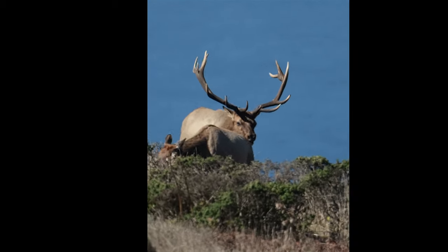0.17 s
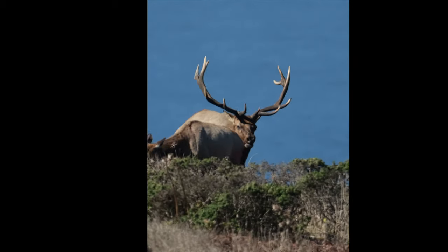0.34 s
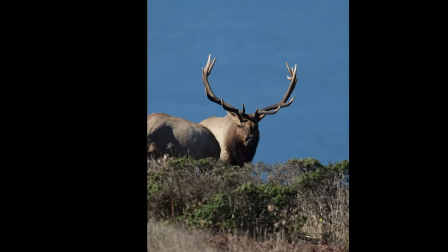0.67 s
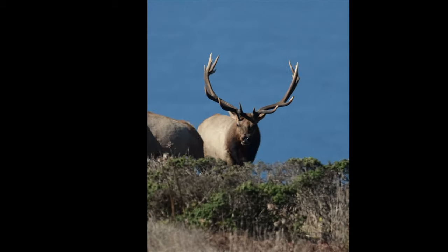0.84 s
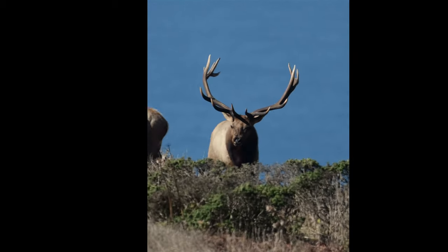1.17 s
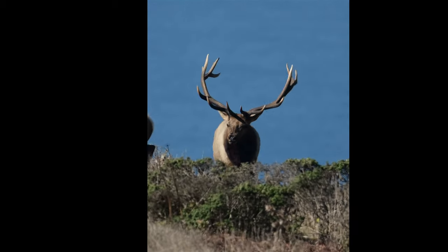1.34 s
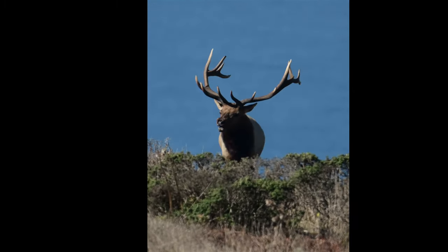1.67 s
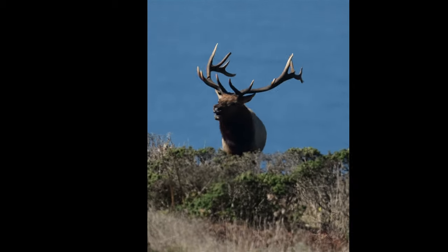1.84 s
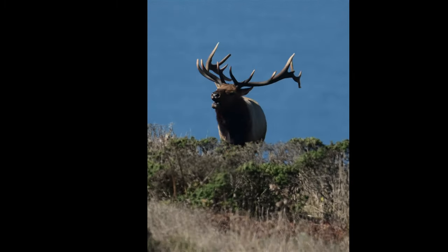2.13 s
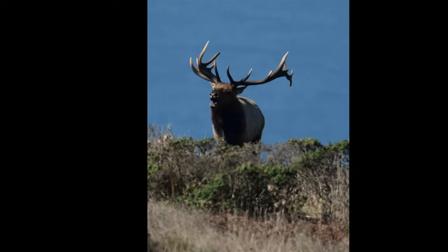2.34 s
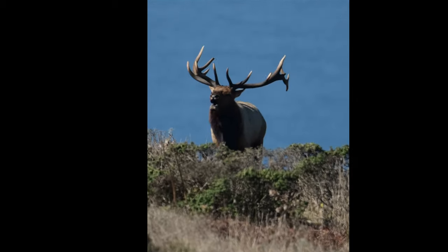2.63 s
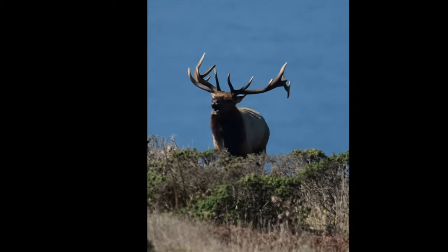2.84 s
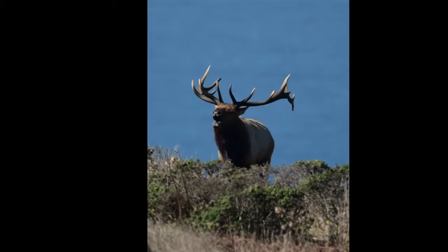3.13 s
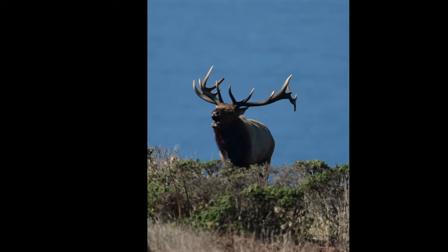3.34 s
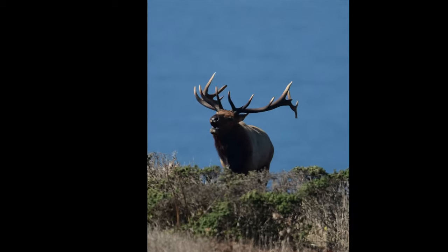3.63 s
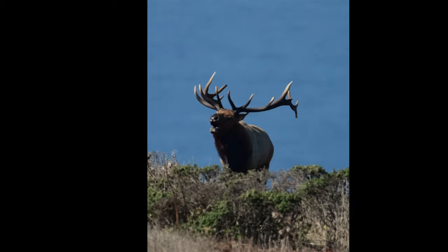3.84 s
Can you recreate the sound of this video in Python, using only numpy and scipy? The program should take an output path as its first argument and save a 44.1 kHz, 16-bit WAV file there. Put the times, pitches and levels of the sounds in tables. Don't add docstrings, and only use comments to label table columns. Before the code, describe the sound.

A bull elk bugles, its whistle leaping up into a held, buzzing high note over wind.

```python
import sys
import numpy as np
from scipy import signal
from scipy.fft import rfft, irfft, next_fast_len
from scipy.io import wavfile
from scipy.ndimage import uniform_filter1d, map_coordinates

SR = 44100
rng = np.random.default_rng(int(sys.argv[2]) if len(sys.argv) > 2 else 0)


def voltage_ratio(decibels):
    exponent = np.asarray(decibels, float) / 20
    return 10 ** exponent


def wav_record(signal):
    frames = np.transpose(np.atleast_2d(signal))
    bounded = np.clip(frames, -1, 1)
    quanta = np.round(bounded * 32767).astype(np.int16)
    wavfile.write(sys.argv[1], SR, quanta)


N = 176400
TIME = np.arange(N) / SR

# pitch_hz, level_db (per Hz)
ROAR_COLOUR = [(15, -55), (25, -13), (48, -1.5), (168, -5), (306, -8), (546, -8.5), (787, -12), (1950, -25),
               (2500, -18.5), (3250, -62), (5500, -120)]
# pitch_hz, side_over_mid_db
ROAR_WIDTH = [(60, -42), (160, -52), (270, -34), (450, -16.5), (740, -12), (1220, 4), (2010, 4.5)]
# pitch_hz, width_hz, level_db, side_over_mid_db
HUMS = [
    (181.8, 17, -68, -45),
    (268.6, 7.5, -68, -37),
    (491.8, 18.5, -70.5, -19),
    (555.5, 46, -67.5, -29),
    (628.5, 12, -75, -1),
    (1008, 334, -66, -12.5),
    (1899, 93, -69, 3),
]
# time_s, level_db
GUSTS = [
    (0, -57),
    (.25, -52.5),
    (.85, -58.5),
    (1.5, -60.5),
    (2.15, -56),
    (2.5, -52.5),
    (3.1, -58),
    (3.45, -50.5),
    (3.6, -62),
    (4, -82),
]
# pitch_hz, level_db
RUMBLE_COLOUR = [(30, -24), (60, 3), (110, -3.5), (190, -4.5), (300, -8.5), (500, -47)]
# peak_s, level_db, pitch_hz
THUMPS = [(0.057, -43.5, 126), (0.097, -51, 174), (0.14, -49, 84), (0.158, -39, 125), (0.195, -41.5, 108),
          (0.219, -41, 137), (0.252, -38.2, 132), (0.269, -46, 165), (0.358, -39.5, 189),
          (0.384, -48.5, 152), (0.411, -50, 100), (0.441, -31, 174), (0.608, -44, 154), (0.64, -40.5, 130),
          (0.826, -37, 164), (0.856, -41, 97), (0.912, -46, 136), (0.944, -43.5, 150), (1.008, -42.5, 143),
          (1.671, -44, 100), (1.831, -46, 101), (1.88, -45, 141), (2.222, -51, 154), (2.315, -38.5, 103),
          (2.331, -35.5, 167), (2.359, -50, 148), (2.402, -37.5, 111), (2.445, -44, 116),
          (2.47, -44.3, 94.5), (2.601, -37, 186), (2.64, -39, 123), (2.685, -37.5, 129),
          (2.716, -40.5, 160), (2.821, -38.5, 149), (3.017, -46, 124), (3.049, -42.2, 143),
          (3.13, -44, 170), (3.193, -43, 93), (3.211, -43.1, 109), (3.347, -44, 159), (3.428, -46.5, 170),
          (.816, -34, 100), (3.003, -40.5, 109), (3.11, -42, 89)]
# start_s, length_s, from_hz, to_hz, level_db
CHIRPS = [
    (.47, 0.056, 6170, 6370, -64),
    (2.245, 0.041, 8730, 7340, -52),
    (2.269, 0.024, 7800, 7540, -52),
    (2.42, 0.043, 8700, 7700, -65),
    (2.506, 0.046, 8350, 7900, -65),
]
# start_s, level_db, fade_60db_s, lowest_hz, highest_hz, ring_hz
TICKS = [
    (1.2575, -39, .005, 500, 5000, 6000),
    (1.7908, -36.5, .012, 3000, 3500, 4000),
]
# time_s, level_db
HUFF = [
    (2.68, -110),
    (2.74, -70),
    (2.9, -66),
    (2.98, -61),
    (3.03, -72),
    (3.08, -110),
]
# start_s, end_s, from_hz, to_hz
STEPS = [
    (2.728, 2.772, 755, 790),
    (2.808, 2.878, 1015, 1090),
    (2.878, 2.918, 1080, 1172),
    (2.918, 2.972, 1440, 1472),
    (2.974, 2.994, 1520, 1685),
    (2.994, 3.013, 1695, 1722),
    (3.013, 3.048, 1790, 1955),
    (3.048, 3.094, 1965, 2060),
    (3.094, 3.11, 2060, 2090),
]
# level_db, overtones_db, half_order_lines_db, grain_0_to_1
STEP_STRENGTH = [
    (-51, -16, -20, 0.8),
    (-43, -14, -17, 0.77),
    (-46.5, -12, -7, 0.9),
    (-35, -13, -6.5, 0.2),
    (-53, 12, -14, 1),
    (-42, 4, -18, .6),
    (-50, 9.5, -28, 0.18),
    (-46, 9, -28, 0.06),
    (-41, 2.5, -26, 0.1),
]
# pitch_hz, level_db
THROAT = [(2100, 0.5), (2900, -10.5), (3400, -21), (3750, 6.5), (4300, 2), (5200, -11), (6200, 0),
          (8300, -13.5), (9500, -45)]
# time_s, whistle_hz, folds_hz
HOLD = [(3.1, 2165, 275), (3.12, 2235, 265), (3.14, 2262, 254), (3.2, 2286, 243), (3.3, 2285, 226),
        (3.36, 2290, 218), (3.43, 2297, 209), (3.5, 2310, 206), (3.62, 2311, 205), (3.83, 2300, 204),
        (4, 2294, 203)]
# time_s, level_db, lean_db and buzz_db (per sideband)
MOUTH = [
    [(3.11, -67, 5, -4), (3.15, -69.5, 10.5, -3.5), (3.2, -60.5, 1.1, -4.5), (3.26, -55.5, 1.5, -5),
     (3.31, -54.5, 1.5, -3), (3.36, -56, 0.5, 1), (3.42, -55, 1.3, 1), (3.5, -57, 0, 4.1),
     (3.56, -58.5, 1.5, 3), (3.62, -56, -1.5, 2.5), (3.64, -57.7, 3.5, -1), (3.73, -52.5, 3.5, -5.3),
     (3.75, -53, -1, 0.5), (3.83, -50.5, -0.5, -1), (3.91, -54.5, 1, 2), (4.0, -56, -2.7, -2)],
    [(3.11, -45, -6, -15), (3.15, -52, -8, -11.5), (3.2, -59, -2, -6.5), (3.26, -62, 1, 1),
     (3.31, -53.5, 0.3, -3.5), (3.36, -60.5, 1.4, 3.0), (3.42, -63.5, 1.7, 0.6), (3.5, -64.5, 0.5, -0.5),
     (3.56, -64.5, 2.4, 2.5), (3.62, -60.5, 0.7, 0.8), (3.64, -66, 3, 1), (3.73, -72, 3.8, 2),
     (3.75, -69.5, 1.5, 2.5), (3.83, -56, 0.5, -0.8), (3.91, -54, 1, -1.2), (4.0, -55.3, 0.3, -1.3)],
    [(3.11, -54.5, 7, -6), (3.15, -43, 6, -14), (3.2, -39, -5, -15), (3.26, -43.5, -4.5, -8.5),
     (3.31, -53.5, -8, -4.5), (3.36, -66, 2, 4), (3.42, -53.5, 0, -1.7), (3.5, -58.5, -1, 2),
     (3.56, -68.5, -1.7, 6), (3.62, -55.5, -2, 2), (3.64, -60, -5, -2), (3.73, -54.5, 0.4, -2.5),
     (3.75, -54.5, 2, 2.5), (3.83, -48, 1.2, -2), (3.91, -50, -3, -4.5), (4.0, -53.5, 0.5, -2.5)],
]
SIDEBANDS = [
    (-25, -7.5, -13, 18.8, 20.8, 21.1, -4.5, -35, -43),
    (-8.5, -6.5, 3.5, 7.2, 3.9, 10.5, 2, -2.5, -7),
    (-13, -10, 2.5, 8.3, 10, 2.5, -4.3, -21, -33),
]
# time_s, level_db
FOURTH = [
    (3.12, -60),
    (3.15, -27),
    (3.25, -26.5),
    (3.32, -33),
]
# start_s, end_s
BREAK_S = (3.63, 3.739)
FRAY_S = (3.32, 3.5, 3.74, 3.8)
# pitch_hz, lead_radians
LEFT_LEAD = [(2200, 0.56), (4500, -.1), (6700, 0.87)]
# pitch_hz, level_db
HISS_COLOUR = [(1500, -9.5), (3000, 0.5), (5000, -0.5), (9000, -4.5), (13000, -8.5), (15700, -15)]
# pitch_hz, width_hz, gain_left_at_centre
NOTCHES = [(2591, 850, 0.09), (7770, 1530, 0.036)]
# multiple_of_base_pitch, level_db
WHINE = [(4, -88), (5, -85)]


def unit(x):
    return x / np.sqrt(np.mean(x ** 2) + 1e-20)


def along(points, hz):
    f, v = np.transpose(points)
    return np.interp(np.log(hz + 1), np.log(f + 1), v)


def curves(rows):
    s, *cols = np.transpose(rows)
    return [np.interp(TIME, s, c) for c in cols]


def wobble(rate, size=N):
    knots = rng.standard_normal(int(size * rate / SR) + 4)
    return map_coordinates(knots, [np.arange(size) * rate / SR])


def filtered(x, response):
    m = next_fast_len(N + SR // 2)
    return irfft(rfft(x, m) * response(np.fft.rfftfreq(m, 1 / SR)), m)[..., :N]


def band(f, hz, width_hz):
    return 1j * f * width_hz / (hz * hz - f * f + 1j * f * width_hz)


def spread(response, wide_db):
    noise = rng.standard_normal((2, N))
    mid, side = filtered(noise, lambda f: response(f) * [np.ones_like(f), voltage_ratio(wide_db(f))])
    return np.array([mid + side, mid - side]) / np.std(mid)


def turns(hz):
    return 2 * np.pi * np.cumsum(hz) / SR


def roar():
    level_db = -56 + 1.23 * wobble(2.88)
    out = voltage_ratio(level_db) * spread(lambda f: voltage_ratio(along(ROAR_COLOUR, f)), lambda f: along(ROAR_WIDTH, f))
    for hz, width_hz, db, wide_db in HUMS:
        out = out + voltage_ratio(db) * spread(lambda f: band(f, hz, width_hz) ** 2, lambda f: wide_db + 0 * f)
    deep_hz = 62 + 1.93 * wobble(5.49)
    return out + voltage_ratio(-59.5 + 1.6 * wobble(4.5)) * np.sin(turns(deep_hz))


def buffets():
    thump_cycles, lumps_db = 0.62, -0.5
    gust_db, = curves(GUSTS)
    rumble = unit(filtered(rng.standard_normal(N), lambda f: voltage_ratio(along(RUMBLE_COLOUR, f))))
    out = voltage_ratio(gust_db - 2) * unit(rumble * voltage_ratio(lumps_db * wobble(24.3)))
    for s, db, hz in THUMPS:
        cycles = (TIME - s) * hz
        swell = np.exp(-(cycles / thump_cycles) ** 2)
        out = out + voltage_ratio(db - 1.0) * swell * np.cos(2 * np.pi * cycles + rng.uniform(0, 2 * np.pi))
    return out


def birds():
    out = np.zeros(N)
    for s, length_s, from_hz, to_hz, db in CHIRPS:
        u = np.arange(round(length_s * SR)) / SR / length_s
        hz = from_hz + (to_hz - from_hz) * u ** 0.89 + 90 * wobble(230, size=len(u))
        out[round(s * SR):][:len(u)] += voltage_ratio(db) * np.sin(np.pi * u) * np.sin(turns(hz))
    return out * voltage_ratio([[-2.5], [1.5]])


def ticks():
    out = np.zeros((2, N))
    for s, db, fade_s, low_hz, high_hz, ring_hz in TICKS:
        u = TIME - s
        fade_db = -60 * np.maximum(u - fade_s / 2, 0) / fade_s
        burst = rng.standard_normal((2, N)) * (u > 0) * voltage_ratio(db + fade_db)

        def body(f):
            low_cut = (1j * f / (low_hz + 1j * f)) ** 2
            return (1 + band(f, ring_hz, 600)) * low_cut / (1 + 1j * f / high_hz) ** 2 / (1 + (f / 13000) ** 8)
        out += filtered(burst, body)
    return out


def climb():
    swell_share, ring_s, overtone_ring_s = 0.7, 0.13, 0.012
    out = np.zeros(N)
    t = np.arange(SR // 4) / SR
    for (s, end, from_hz, to_hz), (db, over_db, half_db, grain) in zip(STEPS, STEP_STRENGTH):
        part = t / (end - s)
        glide = np.maximum(1 - part, 0) ** 2
        hz = to_hz - (to_hz - from_hz) * glide + 6 * wobble(70, size=len(t))
        phase = turns(hz)
        after = np.maximum(t - (end - s), 0)
        rise = np.sin(np.pi / 2 * np.minimum(part / swell_share, 1))
        tone = rise * voltage_ratio(2 * grain * wobble(50, size=len(t)) - 60 * after / ring_s) * np.sin(phase)
        for k in np.arange(4, 11) / 2:
            level_db = over_db + half_db * 2 * (k % 1) + along(THROAT, k * hz) - 4 * (k - 2)
            level_db = level_db + 3.1 * wobble(56, size=len(t)) - 60 * after / overtone_ring_s
            rasp = (1 + grain * wobble(510, size=len(t))) / np.hypot(1, grain)
            tone = tone + rasp * rise ** 0.32 * voltage_ratio(level_db) * np.sin(k * phase)
        out[round(s * SR):][:len(t)] += voltage_ratio(db) * tone
    huff_db, = curves(HUFF)
    air = unit(filtered(rng.standard_normal(N),
                        lambda f: band(f, 3700, 460) ** 2 + 0.13 * band(f, 4200, 2500) ** 2))
    return out + voltage_ratio(huff_db) * air


def slope(x):
    fade_60db_s = 0.11
    t = TIME[:SR // 3]
    tail = rng.standard_normal((2, len(t))) * voltage_ratio(-60 * t / fade_60db_s)
    delayed = np.pad(x, (200, 0))[None]
    return signal.fftconvolve(delayed, tail / np.linalg.norm(tail[0]), axes=1)[:, :N]


def hold():
    attack_s, break_edge_s = 0.014, 0.004
    calm, break_rough, jitter_hz = 0.14, 0.28, 18
    flutter_db, flicker, breath_db = 1.2, 4.5, -9
    a = round(HOLD[0][0] * SR)
    whistle_hz, folds_hz = [c[a:] for c in curves(HOLD)]
    n, t = N - a, TIME[a:]
    fourth_db = curves(FOURTH)[0][a:]
    inside_s = np.minimum(t - BREAK_S[0], BREAK_S[1] - t)
    broken = np.clip(inside_s / break_edge_s + 0.5, 0, 1)
    rough = calm + (break_rough - calm) * broken
    high = turns(whistle_hz + 16 * broken + jitter_hz * rough * wobble(127.2, size=n))
    low = turns(folds_hz + 7.7 * broken + jitter_hz * 0.84 * rough * wobble(91, size=n))
    out = np.zeros(n)
    for k in range(4):
        j = min(k, 2)
        level_db, lean_db, buzz_db = [c[a:] for c in curves(MOUTH[j])]
        lines = np.zeros(n)
        for m, db in enumerate(SIDEBANDS[j], -4):
            flutter = wobble(18.26, size=n) + flicker * rough * wobble(71.2, size=n)
            line_db = db + m * lean_db + abs(m) * buzz_db + flutter_db * (1 + j) / 2 * flutter
            lines += voltage_ratio(line_db) * np.cos((k + 1) * high + m * low + rng.uniform(0, 2 * np.pi))
        slow = uniform_filter1d(uniform_filter1d(rng.standard_normal(n), size=50), size=50)
        air = unit(slow) * np.cos((k + 1) * high) * (1 + 0.2 * np.cos(low))
        air_db = breath_db + 14 * rough + 2 * (j == 0)
        out += voltage_ratio(level_db + fourth_db * (k == 3)) * (lines + voltage_ratio(air_db) * air)
    out *= 1 + 0.3 * broken * np.cos(low / 2 + wobble(30.3, size=n))
    rasp, under = filtered(rng.standard_normal((2, N)), lambda f: [
        band(f, 4700, 1900) ** 2 + 0.58 * band(f, 5700, 1200) ** 2,
        band(f, 1050, 60) ** 2])[:, a:]
    fray = np.interp(t, FRAY_S, [0.29, 0.58, 0.72, 0.11])
    rasp = voltage_ratio(-56.5 + 3.3 * wobble(41, size=n)) * unit(rasp) * (1 + 0.55 * np.cos(low))
    out += fray * (rasp + voltage_ratio(-60.5) * unit(under))
    return np.pad(out * np.minimum(np.arange(n) / SR / attack_s, 1), (a, 0))


def scene():
    left_db, echo_db = -8.5, -17.5
    elk = climb() + hold()
    left = voltage_ratio(left_db) * filtered(elk, lambda f: np.exp(1j * along(LEFT_LEAD, f)))
    call = np.array([left, elk]) + voltage_ratio(echo_db) * slope(elk)
    return roar() + buffets() + birds() + ticks() + call


def roll_off(x):
    return signal.sosfilt(signal.butter(12, 15735, fs=SR, output="sos"), x)


def record(dry):
    hiss_db, whine_hz = -65.5, 1190
    hiss = unit(filtered(rng.standard_normal((2, N)), lambda f: voltage_ratio(along(HISS_COLOUR, f))))

    def housing(f):
        return np.prod([1 - (1 - rest) * band(f, hz, width_hz) for hz, width_hz, rest in NOTCHES], axis=0)
    whine = sum(voltage_ratio(db - 3.5) * np.sin(2 * np.pi * whine_hz * k * TIME) for k, db in WHINE)
    mix = filtered(dry + voltage_ratio(hiss_db) * hiss, housing) + whine
    return roll_off(mix)


dry = scene()
out = record(dry)
wav_record(out)
```